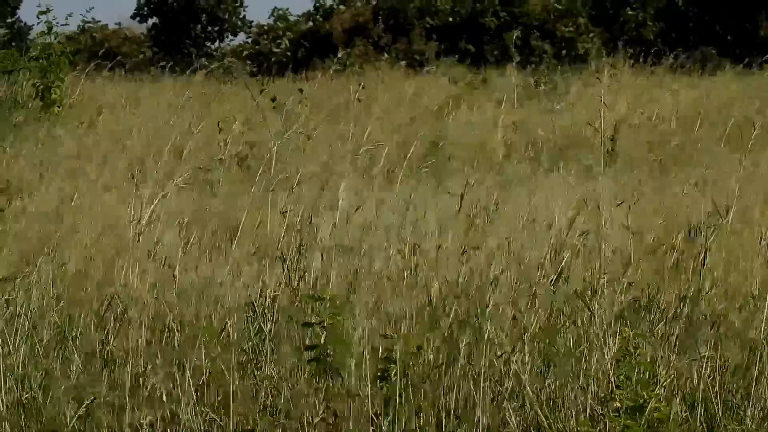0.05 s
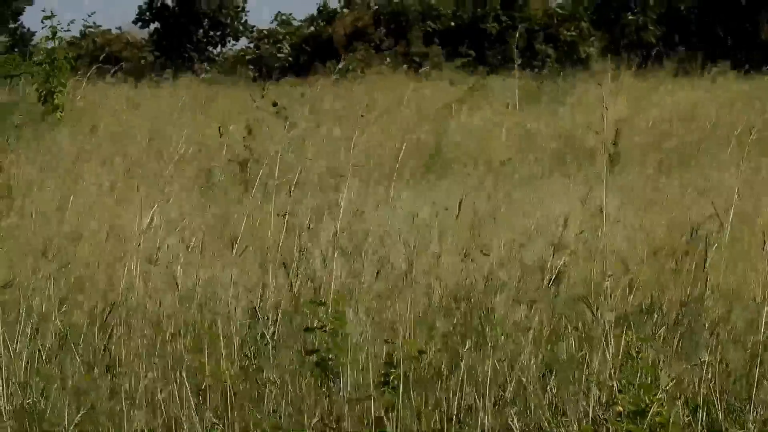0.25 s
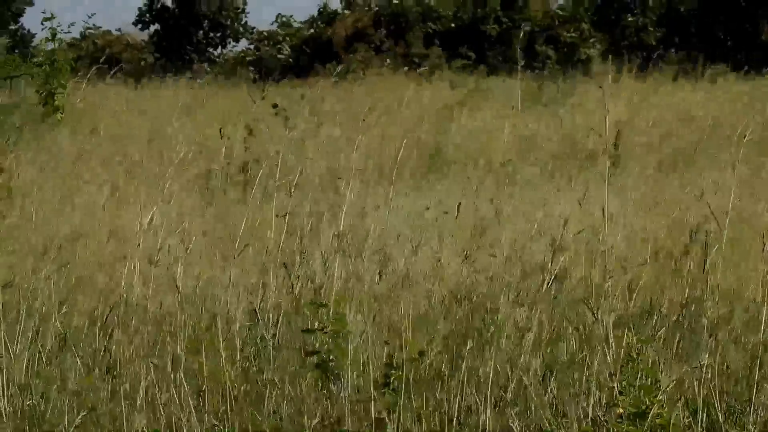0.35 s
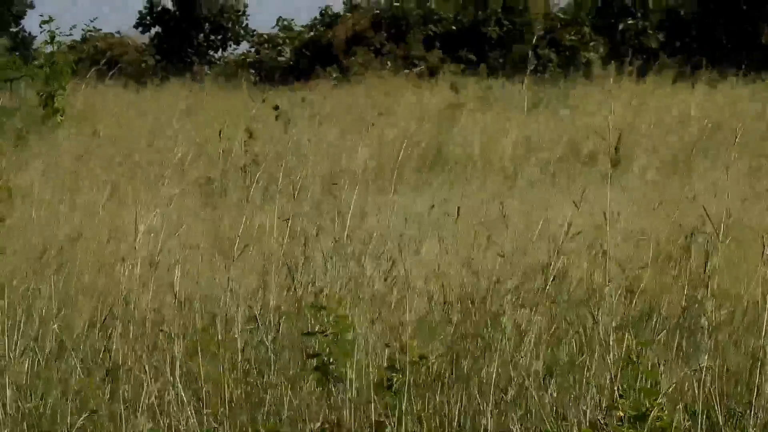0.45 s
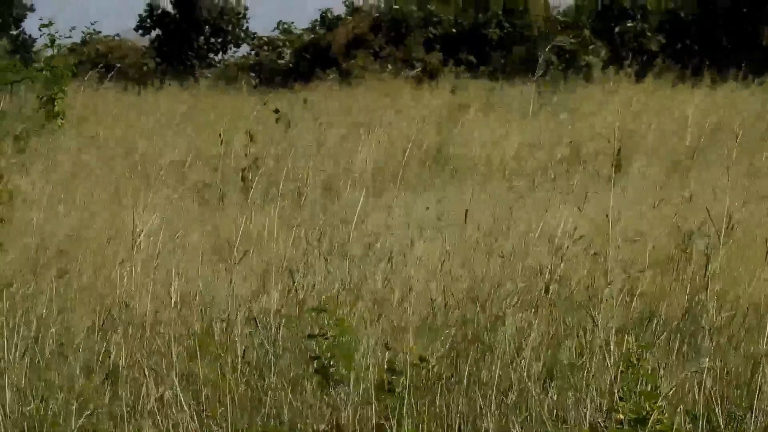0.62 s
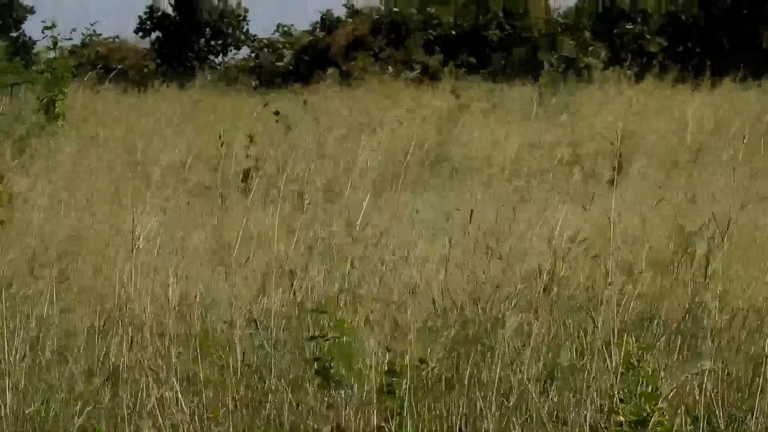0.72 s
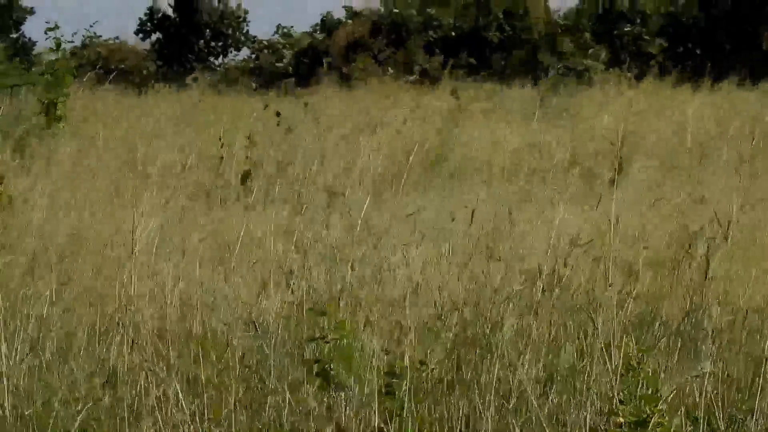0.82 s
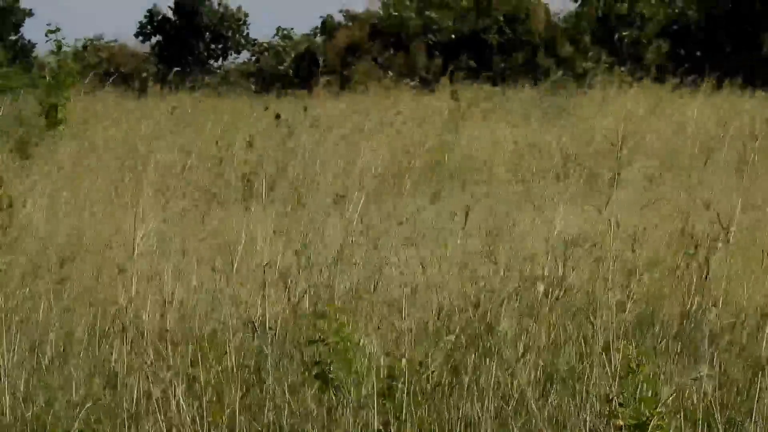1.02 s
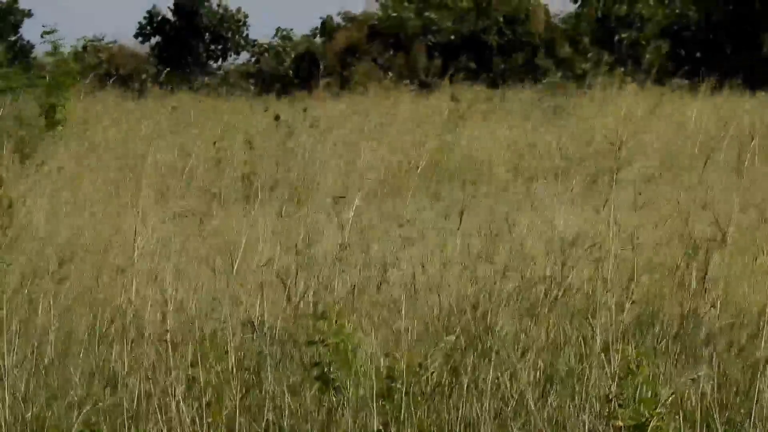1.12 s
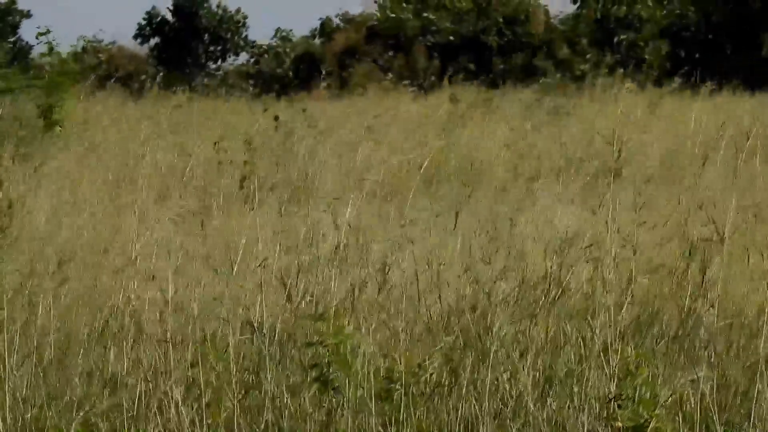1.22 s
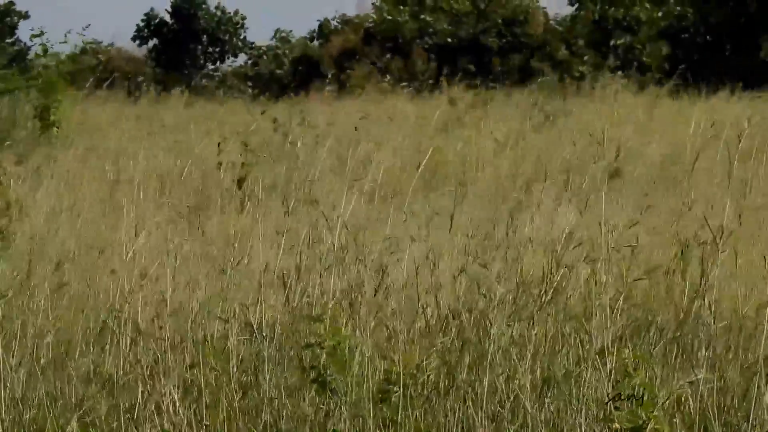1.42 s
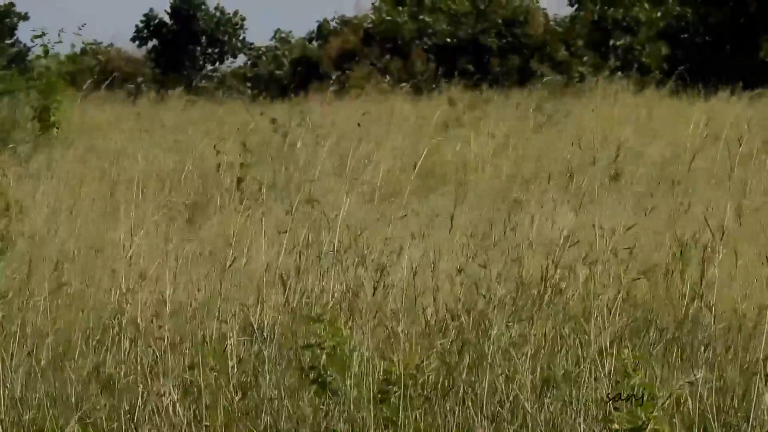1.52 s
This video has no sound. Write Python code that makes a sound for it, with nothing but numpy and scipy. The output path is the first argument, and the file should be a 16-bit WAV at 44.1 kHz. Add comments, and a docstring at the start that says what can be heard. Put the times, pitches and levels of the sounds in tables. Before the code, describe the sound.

Gusts of wind rumble and thump against the microphone in an open field, one hard blow dipping the volume early on. Grass hisses underneath, with faint bird chips, tiny insect ticks and short distant horn toots near the end.

```python
"""Wind in tall grass

Countless stalks hiss while turbulence and single eddies buffet the microphone, mostly its right port.
One hard blow makes the gain control duck; the field then swells slowly back.
A small bird chips, two insects tick, a dry stalk snaps and a far horn toots."""
import sys
import numpy as np
from scipy import signal
from scipy.fft import rfft, irfft
from scipy.io import wavfile
from scipy.ndimage import uniform_filter1d

SR = 44100
rng = np.random.default_rng(int(sys.argv[2]) if len(sys.argv) > 2 else 0)


def to_wav(sig):
    """Store sig (one row per channel, or 1-D mono) as 16-bit WAV at the path in sys.argv[1].

    Samples outside -1..1 are clipped; the rate is SR.
    """
    pcm = np.clip(np.atleast_2d(sig), -1, 1) * 32767
    pcm = np.round(pcm).astype(np.int16)
    wavfile.write(sys.argv[1], SR, pcm.T)  # frames by channels


N = 68355
T = np.arange(N) / SR
BINS_HZ = np.fft.rfftfreq(N, 1 / SR)


def amp(db):
    """Decibels to gain."""
    return 10 ** (np.asarray(db) / 20)


def unit(x):
    """Scale to rms 1."""
    return x / np.sqrt(np.mean(x ** 2) + 1e-20)


def curve(points):
    """Interpolate a table over time."""
    return np.interp(T, *np.transpose(points))


def spectrum(points, hz):
    """Interpolate a table over log frequency."""
    freq_hz, value = np.transpose(points)
    return np.interp(np.log(hz + 1), np.log(freq_hz), value)


def shaped_noise(gains):
    """Noise with one gain per frequency bin, rms 1."""
    return unit(irfft(rfft(rng.standard_normal(N)) * gains, N))


def wander(rate_hz):
    """Random motion below about rate_hz, rms 1."""
    return shaped_noise(np.exp(-(BINS_HZ / rate_hz) ** 2))


def band_noise(low_hz, high_hz):
    """Band-passed noise, rms 1."""
    sos = signal.butter(4, [low_hz, high_hz], "band", fs=SR, output="sos")
    return unit(signal.sosfilt(sos, rng.standard_normal(N)))


def highpass(x, hz):
    """Second-order low cut."""
    return signal.sosfilt(signal.butter(2, hz, "high", fs=SR, output="sos"), x)


def glide(centre_s, pitch_hz, length_s, fall_hz):
    """Short falling whistle under a smooth window."""
    out, on = np.zeros(N), abs(T - centre_s) < length_s / 2
    u = (T[on] - centre_s) / length_s
    cycles = length_s * (pitch_hz * u - fall_hz * u ** 2 / 2)
    out[on] = np.cos(np.pi * u) ** 2 * np.sin(2 * np.pi * cycles)
    return out


# Hiss spectrum: freq_hz, density_db
GRASS_SPECTRUM = [(25, -58), (60, -24.5), (120, 5), (300, -2.5), (520, -2), (1000, -3), (1800, -7),
                  (3000, -11), (4300, -13), (5200, -17.5), (6100, -13.5), (7100, -26), (8100, -30.5),
                  (9200, -38), (13000, -53.5)]
# Left-right likeness of the hiss: freq_hz, correlation
GRASS_CORRELATION = [(60, 0.5), (200, .6), (500, 0.92), (1500, 0.83), (4300, 0.21), (6500, 0.39),
                     (12000, 0)]
# Swell of the field: time_s, gain_db
GRASS_SWELL = [(.06, -2.5), (.26, -2.5), (.33, -0.5), (.5, -2.5), (.8, -2), (1.2, -1.5), (1.37, -0.5),
               (1.55, -1.5)]


def grass(level_db=-47, patch_db=0.5, size=512, hop=128):
    """Air moves over countless stalks; they hiss together in drifting patches."""
    hz = np.fft.rfftfreq(size, 1 / SR)
    noise = rng.standard_normal((N // hop + 5, len(hz), 5)).T
    left = noise[0] + 1j * noise[1]
    independent = noise[2] + 1j * noise[3]
    correlation = spectrum(GRASS_CORRELATION, hz)[:, None]
    right = correlation * left + np.sqrt(1 - correlation ** 2) * independent
    patches = uniform_filter1d(noise[4], size=7, axis=0)  # across frequency
    patches = unit(uniform_filter1d(patches, size=20, axis=1))  # across time
    gains = amp(spectrum(GRASS_SPECTRUM, hz)[:, None] + patch_db * patches)
    _, hiss = signal.istft(np.array([left, right]) * gains, nperseg=size, noverlap=size - hop)
    return unit(hiss[:, :N]) * amp(level_db + curve(GRASS_SWELL))


# Song of each insect: first_tick_s, ticks_per_s, pitch_hz
INSECT_SONGS = [(.076, 7.35, 8130), (.095, 6.9, 7830)]
# Loudness of each insect: peak_db, left_minus_right_db
INSECT_LEVELS = [(-66, 5.5), (-66.5, -5)]


def insects(roughness=0.3, rough_hz=250):
    """Each insect rasps faint ticks at its own steady rate."""
    out = np.zeros((2, N))
    for (first_s, ticks_per_s, pitch_hz), (peak_db, pan_db) in zip(INSECT_SONGS, INSECT_LEVELS):
        times_s = np.arange(first_s, T[-1], 1 / ticks_per_s)
        ticks = sum(glide(s, pitch_hz, length_s=0.018, fall_hz=200) for s in times_s)
        for side, side_db in enumerate((pan_db / 2, -pan_db / 2)):
            out[side] += ticks * amp(peak_db + side_db) * (1 + roughness * wander(rough_hz))
    return out


# Bird chips: centre_s, peak_db
BIRD_CHIPS = [(0.245, -54), (0.278, -51.5), (.497, -57), (0.538, -59), (0.754, -53.5), (1.002, -52.5),
              (1.222, -50)]


def bird(pitch_hz=5700, right_db=-7):
    """A small bird whistles thin falling chips from the left."""
    chips = sum(amp(db) * glide(s, pitch_hz, length_s=0.034, fall_hz=650) for s, db in BIRD_CHIPS)
    return chips * amp([[0], [right_db]])


# Stalk snap: centre_s, level_db
STALK_SNAPS = [(1.092, -48)]


def stalk_snap(fade_s=0.0046):
    """One dry stalk ticks against another."""
    envelope = sum(amp(db) * np.exp(-abs(T - s) / fade_s) for s, db in STALK_SNAPS)
    return np.array([band_noise(2800, 6500) for _ in range(2)]) * envelope


# Horn toots: start_s, length_s, level_db
HORN_TOOTS = [(1.183, .035, -39.5), (1.343, .026, -40), (1.42, .06, -52)]
# Horn harmonics, sixth upward: gain_db
HORN_HARMONICS = [-17, 0, -12, -21, -22]


def horn(pitch_hz=392.5, rise_s=0.012, fade_s=0.032, right_db=-13, waver_db=3.5, waver_hz=30):
    """Only the upper harmonics of a far horn carry; each toot lingers over the field."""
    envelope = np.zeros(N)
    for start_s, length_s, level_db in HORN_TOOTS:
        rise = np.clip((T - start_s) / rise_s, 0, 1)
        tail = np.exp(-np.maximum(T - start_s - length_s, 0) / fade_s)
        envelope += amp(level_db) * rise * tail
    tone = np.zeros((2, N))
    for k, gain_db in enumerate(HORN_HARMONICS, 6):
        harmonic = np.sin(2 * np.pi * (k * pitch_hz * T + rng.random()))
        for side, side_db in enumerate((0, right_db)):
            tone[side] += harmonic * amp(gain_db + side_db + waver_db * wander(waver_hz))
    return tone * envelope


def port_delay(field, left_lag_s=56e-6):
    """Sound from the field meets the right port first."""
    lag = np.exp(-2j * np.pi * BINS_HZ * left_lag_s)
    return np.array([irfft(rfft(field[0]) * lag, N), field[1]])


# Port rumble spectrum: freq_hz, density_db
RUMBLE_SPECTRUM = [(25, -46), (60, -25), (120, -8.5), (190, 4), (270, -0.5), (380, -4.5), (500, -12.5),
                   (800, -35.5), (1300, -52), (3000, -66), (12000, -100)]
# Wind pressure on the right port: time_s, level_db
WIND_PRESSURE = [(.06, -49), (.165, -51), (.185, -30.5), (.225, -20.5), (.255, -35.5), (.34, -30.5),
                 (.36, -21), (.405, -24), (.447, -19.5), (.475, -40), (.535, -35), (.56, -22.5),
                 (.595, -35), (.68, -27), (.755, -19), (.78, -34), (.81, -20.5), (.885, -25), (.93, -44),
                 (.99, -49.5), (1.075, -34), (1.095, -24), (1.22, -29), (1.28, -51), (1.55, -67)]


def buffet(lee_db=-29, flutter_db=3.5, flutter_hz=45.6):
    """Turbulence rumbles in each port independently; the left one lies in the lee."""
    ports = []
    for side_db in (lee_db, 0):
        rumble = shaped_noise(amp(spectrum(RUMBLE_SPECTRUM, BINS_HZ)))
        level_db = curve(WIND_PRESSURE) + side_db + flutter_db * wander(flutter_hz)
        ports.append(rumble * amp(level_db))
    return highpass(np.array(ports), hz=63.7)


# Eddies hitting the microphone: centre_s, level_db, pitch_hz, port (0 left, 1 right)
EDDY_HITS = [(.182, -15.5, 316.6, 1), (.216, -10.5, 421, 1), (0.222, -12.5, 254, 1), (0.232, -14, 222, 1),
             (0.338, -26.5, 200, 0), (.391, -10, 260, 1), (.412, 7, 285.5, 1), (0.558, -6.5, 269, 1),
             (.624, -19, 262, 1), (.749, -10, 356, 1), (0.764, -9, 247, 1), (0.809, 0.5, 272, 1),
             (0.828, -14, 324, 1), (.883, -11, 254, 1), (0.986, -25.5, 228, 0), (1.018, -20, 252, 1),
             (1.09, -14, 317, 1), (1.102, -11.5, 246, 1), (1.123, -16.5, 240, 1), (1.215, -18, 267.6, 1),
             (1.153, -17, 220, 0), (1.155, -14.5, 250, 1), (1.256, -16, 310, 0), (1.397, -17.5, 302, 1)]


def eddies(decay_cycles=0.51, round_s=61e-6, slap_db=-25, slap_s=0.0018):
    """Each eddy is a pressure swing of a few cycles on one port; strong ones also slap."""
    out = np.zeros((2, N))
    slap_noise = band_noise(483, 994)
    for centre_s, level_db, pitch_hz, port in EDDY_HITS:
        t = T - centre_s
        distance_s = np.hypot(t, round_s) - round_s  # |t| with a rounded tip
        envelope = np.exp(-distance_s * pitch_hz / decay_cycles)
        swing = envelope * np.cos(2 * np.pi * (pitch_hz * t + rng.random()))
        slap = amp(slap_db + level_db / 2) * slap_noise * np.exp(-abs(t) / slap_s)
        out[port] += amp(level_db) * (swing + slap)
    return highpass(out, hz=103.6)


def scene():
    """Field and wind at the two ports."""
    field = grass() + bird() + insects() + horn() + stalk_snap()
    return port_delay(field) + buffet() + eddies()


def gain_control(x, dry, trip_db=-9, lag_s=0.008, fall_s=0.0046, depth_db=14.5, recover_db_per_s=10):
    """The first dry peak over trip_db ducks x; the gain drops with a tick, then creeps back."""
    over = abs(dry).max(0) > amp(trip_db)
    trip_s = T[over.argmax()] if over.any() else T[-1]
    since_s = T - trip_s - lag_s
    attack = np.clip(since_s / fall_s, 0, 1)
    duck_db = attack * np.maximum(depth_db - recover_db_per_s * since_s, 0)
    out = x * amp(-duck_db)
    tick_envelope = amp(-38) * np.exp(-abs(since_s - fall_s) / 0.0008)
    out[1] += band_noise(4000, 11500) * tick_envelope
    return out


def record(dry, full_scale=0.9, open_s=0.045, fade_in_s=0.032, top_hz=13300):
    """Soft overload, low cut, gain control, fade-in, steep high cut."""
    saturated = full_scale * np.tanh(dry / full_scale)
    out = gain_control(highpass(saturated, hz=55), dry)
    out *= np.clip((T - open_s) / fade_in_s, 0, 1)
    high_cut = signal.firwin(511, top_hz, window=("kaiser", 9), fs=SR)
    return signal.oaconvolve(out, high_cut[None], "same")


dry = scene()
out = record(dry)
to_wav(out)
```